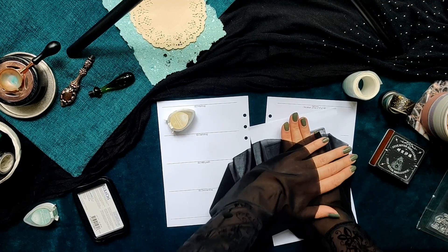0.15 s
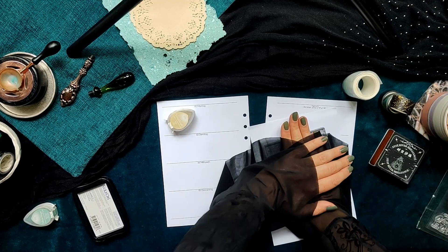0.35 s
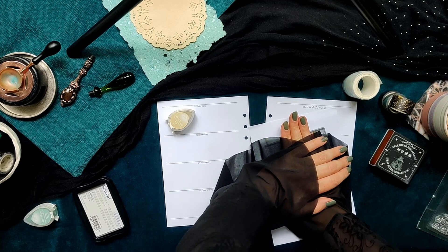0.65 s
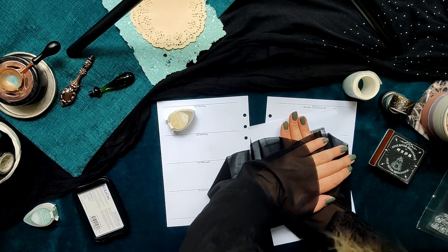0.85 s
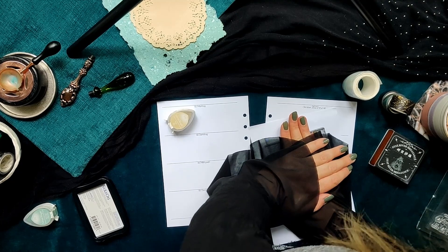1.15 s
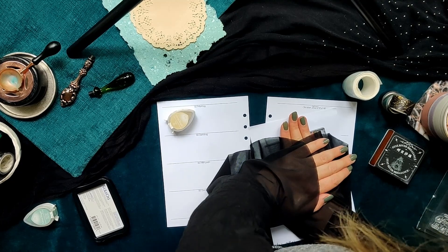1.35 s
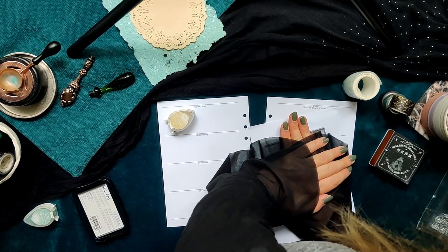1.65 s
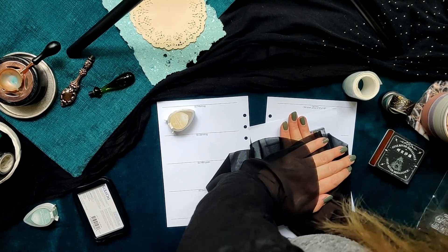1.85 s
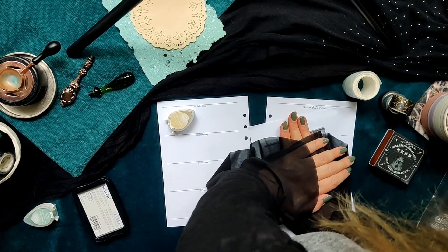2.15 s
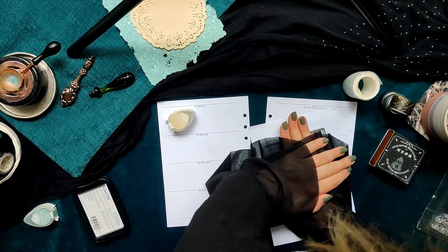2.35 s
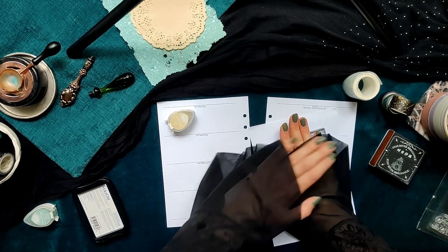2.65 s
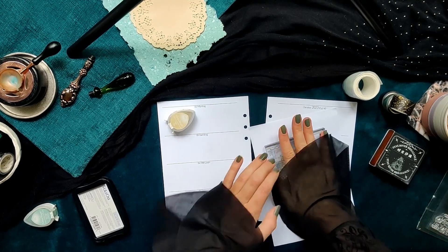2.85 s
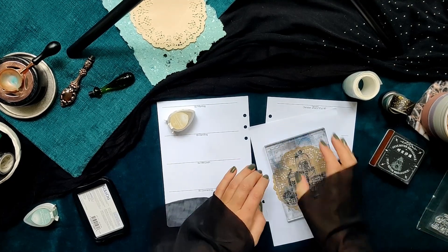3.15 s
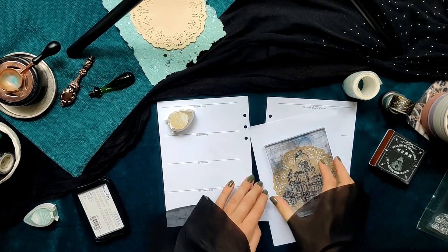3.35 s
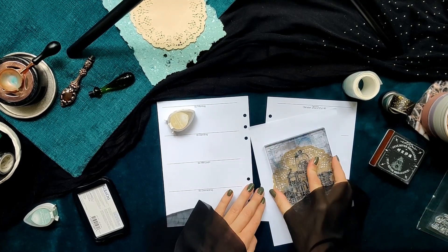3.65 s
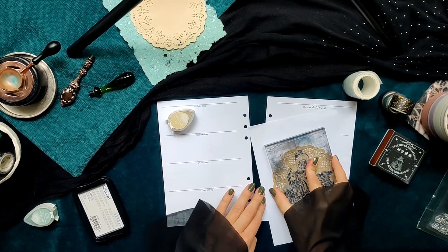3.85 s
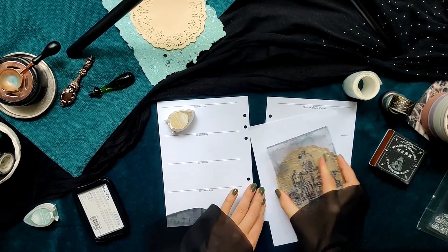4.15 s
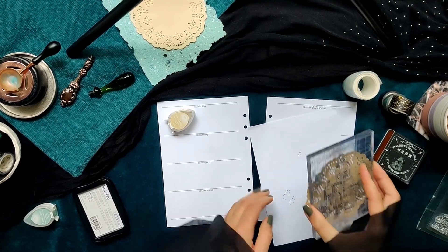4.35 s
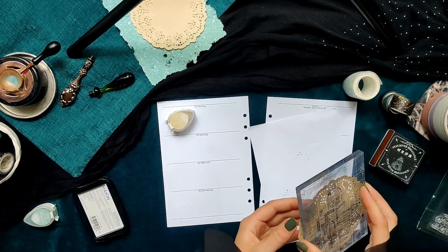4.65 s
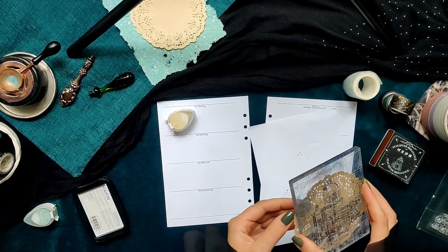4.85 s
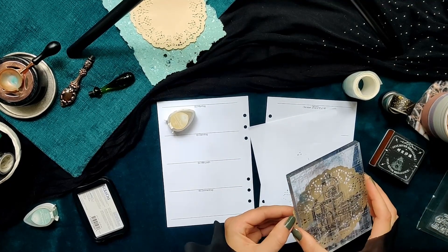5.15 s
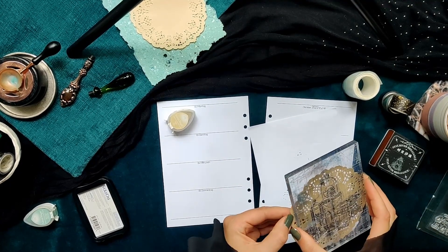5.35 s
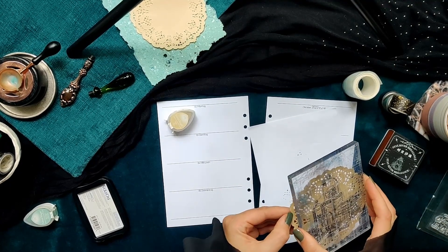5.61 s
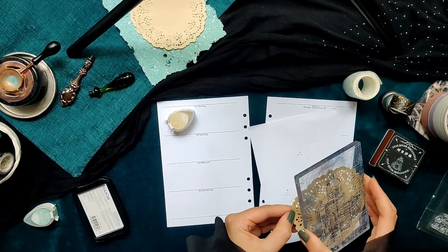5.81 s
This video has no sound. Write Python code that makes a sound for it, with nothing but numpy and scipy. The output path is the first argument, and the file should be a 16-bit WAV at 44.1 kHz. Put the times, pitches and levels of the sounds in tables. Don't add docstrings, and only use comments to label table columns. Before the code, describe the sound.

Close stereo pickup at a table indoors: a strong low boom and cloth brush open, then scattered creaks and pops of table joints grow into sharp woody cracks. Pressure eases, palm and sleeve scuff softly, the block peels and tips with dull thuds, and tiny finger clicks end it. Muffled traffic, a rising engine and faint passing tyres come through the walls.

```python
import sys
import numpy as np
from scipy import signal
from scipy.fft import rfft, irfft
from scipy.io import wavfile
from scipy.ndimage import uniform_filter1d

SR = 44100
rng = np.random.default_rng(int(sys.argv[2]) if len(sys.argv) > 2 else 0)


def voltage_ratio(decibels):
    exponent = np.asarray(decibels, float) / 20
    return 10 ** exponent


def digitize_waveform(pressure):
    field = np.atleast_2d(pressure).T
    bounded = np.clip(field, -1, 1)
    quanta = np.round(bounded * 32767).astype(np.int16)
    wavfile.write(sys.argv[1], SR, quanta)


N = 263596

# [start t/s, peak level/dB, f/Hz]
ROOM_SWELLS = [(-0.06, -16.5, 37.36), (0.23, -22, 36.26), (0.45, -28, 38.5), (0.56, -37, 37.4),
               (0.75, -43, 37.3), (0.93, -38, 36.6), (1.16, -35.5, 36.1), (1.5, -35.5, 36.9),
               (1.7, -39, 36.8), (1.93, -35.5, 35.8), (2.08, -32, 36.5), (2.3, -33.5, 36.7),
               (2.46, -35.5, 37), (2.6, -32.5, 34.75), (2.8, -41, 36.2), (2.87, -33.5, 38.77),
               (3.03, -30.5, 38.3), (3.69, -29.5, 37.04), (3.87, -43, 38.02), (3.95, -42, 41.3),
               (4.08, -35.5, 40.9), (4.22, -50, 41), (4.3, -42, 39.5), (4.41, -36, 38.3),
               (4.6, -33.5, 37.6), (4.88, -33.5, 37.08), (5.41, -33, 36.48), (5.61, -30.5, 37.46),
               (5.93, -36, 37.2), (6.2, -33, 37.2)]
SWELL_DIP, SWELL_ROUND = 0.22, 0.8
SWELL_EDGE_S = 0.33

# [t/s, level/dB]
TRAFFIC = [(0.0, 6), (0.3, 7), (0.58, 7.5), (0.83, 2.5), (1.05, -1.5), (1.3, -4), (2.0, 0.5), (2.2, 3),
           (2.36, 0.5), (3.0, -1), (3.4, 3), (3.8, 0.5), (4.3, -1.5), (4.81, 0), (5.56, 1.5), (5.83, 2.5),
           (5.98, 5.5)]
# [f/Hz, level/dB per Hz]
RUMBLE_SPECTRUM = [(6, -2), (18, 0), (30, 2.5), (50, -8.5), (70, -6), (90, -21), (107, -9.5), (135, -21),
                   (250, -29), (500, -83)]
# [f/Hz, level/dB per Hz]
WASH_SPECTRUM = [(88, -35), (150, -15.5), (254, -8.5), (312, -10.5), (378, -11.5), (407, -14.5),
                 (507, -10.5), (613, -15), (1280, -14), (1370, -17.5), (5000, -34), (6500, -41.5),
                 (11000, -120)]
# [t/s, extra wash level/dB]
PASSING_CARS = [(0, 1.5), (1.0, 1.5), (4.7, 0), (5.4, 0), (5.98, 0)]
RUMBLE_DB, WASH_DB, WASH_FOLLOWS = -41, -54, 0.48

# [f/Hz, level/dB, T60/s]
TOP_MODES = [(463, 5, 0.085), (600, 1, 0.069), (711, 2, 0.083), (880, -5, 0.033), (1177, -1.5, 0.081),
             (1400, -12, 0.029), (1680, 4, 0.015), (2300, -7, 0.02), (2600, -12, 0.02)]
# [f/Hz, level/dB, T60/s]
FRAME_MODES = [(114, -7, 0.064), (135.7, -2, 0.063), (167, -1.5, 0.074), (200.5, -0.5, 0.074),
               (248.8, -3, 0.089), (328, -6.5, 0.091)]
# [f/Hz, level/dB per Hz]
CRACK_SPECTRUM = [(100, -42.5), (300, -9), (700, -3.5), (2270, -5), (3200, -8), (4600, -13.5),
                  (7000, -22.5), (10000, -33.5), (16000, -68)]
# [f/Hz, width/Hz, level/dB]
PANEL_HUMPS = [(480, 70, 3), (705, 70, 2.5), (880, 80, 3.5), (1156, 90, 3), (1610, 100, 2), (2050, 260, 1),
               (2590, 190, 1.5), (3330, 200, 1.5)]
# [t/s, peak level/dB, brightness/dB, thump/dB]
LEANING_SLIPS = [(0.339, -37, -20, -4), (0.346, -29, -23.5, -2.5), (0.354, -34, -6, -21),
                 (0.386, -45, -20, 6), (0.426, -46, -21, -1), (0.499, -35.5, -19, 1),
                 (0.658, -30.5, -15.5, -4), (0.695, -37.5, -20, -4), (0.768, -34.5, -18, -0.5),
                 (0.8, -37, -23, 2), (0.852, -31, -27, -1.5), (0.89, -47, -9, -13), (0.961, -27.5, -15, -4),
                 (0.994, -39, -19, 2), (1.132, -31.5, -20.5, 0.5), (1.161, -24.5, -19, -9),
                 (1.195, -46, -27, 5), (1.666, -38.5, -19, -25), (1.816, -52, -28, 1),
                 (1.959, -17.5, -14.5, -12), (2.0225, -23, -17, -9), (2.142, -18, -16.5, -8.5),
                 (2.183, -21.5, -18, -28), (2.223, -33, -22, -23), (2.289, -38.5, -34, 4),
                 (2.342, -46.5, -19.5, 4)]
# [t/s, peak level/dB, brightness/dB, thump/dB]
LIFTING_SLIPS = [(2.545, -44.5, -33, -26), (2.599, -54, -26, 14.5), (2.689, -48, -7, 3),
                 (2.812, -54, -11, 8), (3.838, -39.5, -17, -7), (3.9085, -37, -19.5, -3),
                 (3.987, -35, -13, -8), (4.028, -53, -20, 7), (4.152, -46, -13, -6),
                 (4.182, -47.5, -19, -1), (4.2, -43, -14, -3), (4.223, -53, -11, -4), (4.37, -57, -15, -16)]
SOFT_DB, TOP_RING_DB, RING_LOSS = -35, -6.5, 0.55
SLIP_S, SHORTENING = 0.0078, 0.017

# [t/s, f/Hz, peak level/dB, T60/s]
TOOL_RING = (0.003, 2000, -50, 0.4)
# [t/s, f/Hz, peak level/dB]
TOP_RING_OUTS = [(.345, 1723, -24.5), (0.358, 1400, -31), (0.361, 1156, -35), (.501, 1400, -35),
                 (.502, 711, -42.5), (.375, 1700, -40), (.385, 1156, -41), (.425, 1350, -42),
                 (.966, 2200, -40), (3.92, 1480, -42), (.66, 1400, -33), (.697, 711, -37), (.772, 711, -42),
                 (.856, 711, -42), (.856, 1724, -37), (1.669, 463, -34), (2.348, 463, -38),
                 (2.6, 463, -37.5), (2.69, 600, -47), (2.814, 2420, -43.5), (3.838, 1750, -31),
                 (3.842, 1173, -38), (3.911, 711, -35.5), (3.911, 1400, -36.5), (3.987, 1400, -32.5),
                 (3.989, 711, -36.5), (3.988, 3450, -33), (3.989, 2300, -33), (3.918, 440, -40),
                 (1.165, 463, -37), (1.965, 463, -36), (2.148, 600, -30), (4.272, 2392, -47),
                 (5.243, 699.6, -45.5), (5.243, 440, -47), (5.243, 1400, -45), (3.92, 560, -47),
                 (3.93, 711, -44), (2.183, 625, -31), (2.22, 1146, -40)]
# [t/s, f/Hz, peak level/dB]
FRAME_THUMPS = [(0.0052, 200, -36), (.035, 220, -36), (.06, 197, -43), (1.668, 189, -44.5),
                (.345, 190, -38), (2.812, 173, -46), (0.0187, 137, -29), (0.0225, 105.6, -27),
                (.36, 254, -32), (.808, 174, -36), (0.9, 177, -41), (1.17, 199, -29.5), (1.6, 230, -51),
                (0.58, 68, -36), (1.96, 174.6, -23.5), (1.962, 110, -30), (2.15, 107, -32),
                (1.165, 170, -32), (1.99, 71.5, -32), (2.146, 161, -29.5), (2.17, 72, -34),
                (1.31, 123, -36.5), (2.549, 123, -36.5), (2.6, 245, -49), (2.2, 271, -31.5),
                (3.9, 110, -35), (3.87, 72, -38), (3.99, 130, -38), (3.91, 260, -38.5), (4.2, 112, -30.5),
                (2.93, 65, -39.5), (0.88, 300, -39), (.855, 240, -39), (.86, 165, -42), (1.163, 285, -40),
                (1.135, 216, -43), (0.69, 420, -44)]
# [t/s, f/Hz, peak level/dB]
PRESSED_RINGS = [(1.161, 3780, -39), (1.163, 2030, -28.5), (1.163, 880, -37), (1.165, 1580, -35),
                 (1.166, 2590, -38.5), (1.166, 705, -44), (1.134, 707, -34), (1.136, 1174, -36),
                 (1.96, 3850, -33), (1.961, 2650, -32), (1.962, 705, -35), (1.964, 2090, -25),
                 (1.961, 1180, -27), (1.966, 1650, -23), (1.99, 1642, -28), (2.024, 2600, -36),
                 (2.025, 3300, -36), (2.026, 1650, -33), (2.027, 880, -35), (2.147, 850, -25),
                 (2.147, 1222, -23), (2.148, 711, -36), (2.148, 1644, -31), (2.149, 2412, -30),
                 (2.15, 2579, -32), (2.152, 2805, -35), (2.176, 2130, -35), (2.177, 1170, -35),
                 (2.185, 900, -34), (2.185, 3284, -27), (2.188, 2575, -31), (2.19, 1340, -32),
                 (2.191, 734, -35.5), (.35, 711, -37.5), (.36, 560, -32), (.345, 440, -39),
                 (.432, 453, -38), (2.547, 1500, -49), (2.548, 1180, -48), (2.575, 753, -45),
                 (2.608, 463, -43.5), (2.688, 880, -50), (2.76, 470.3, -45), (3.91, 3399, -42),
                 (3.989, 2830, -33), (3.992, 2200, -37), (4.013, 1490, -39), (3.988, 3340, -36),
                 (3.989, 1910, -39), (3.925, 1460, -45), (.692, 1450, -44), (.692, 1050, -43),
                 (4.016, 2700, -41), (3.87, 1747, -46), (2.59, 1750, -50), (2.72, 900, -50),
                 (3.87, 395, -42), (4.06, 1349, -43), (.963, 711, -33.5), (.964, 1185, -36),
                 (.66, 711, -36)]
# [t/s, f/Hz, peak level/dB]
TIPPING_THUDS = [(4.181, 150, -28), (4.19, 300, -39), (4.198, 112, -29), (4.206, 190.2, -32),
                 (4.2, 255, -35), (4.213, 460, -42), (4.223, 105, -30), (4.225, 230, -36),
                 (4.244, 110, -37), (4.25, 290, -41)]
# [f/Hz, T60/s]
RING_DECAY = [(72, 0.33), (110, 0.11), (180, 0.11), (255, 0.13), (463, 0.062), (711, 0.12), (1170, 0.063),
              (1730, 0.047), (2400, 0.053), (3400, 0.038)]
PRESS_DAMPING, THUD_DAMPING = 0.55, 0.62

# [peak t/s, rise/s, fall/s, sleeve level/dB, paper and palm level/dB]
BRUSH_STROKES = [(0.09, 0.31, 0.15, -54.5, -54.5), (1.44, .04, .09, -70, -83),
                 (1.556, 0.13, 0.26, -66.5, -66.5), (1.67, 0.011, 0.15, -59, -61),
                 (2.73, 0.17, 0.22, -59, -53), (2.95, 0.27, 0.15, -51.5, -53),
                 (3.19, 0.075, 0.24, -74, -60.5), (3.35, 0.18, 0.22, -56, -58),
                 (3.66, 0.55, .13, -66, -63.5), (4.41, 0.087, 0.27, -63.5, -61)]
# [f/Hz, width/Hz, level/dB]
GAUZE_BANDS = [(3530, 930, -0.5), (5440, 420, -6.5)]
STROKE_DROP_DB, STROKE_ROUND = 20, 1.3

# [t/s, peak level/dB]
SHARP_TICKS = [(.8559, -38), (.9627, -38), (.9687, -38), (.9891, -42), (1.1629, -34), (1.1677, -33),
               (1.1873, -39), (1.2214, -43), (1.9617, -25), (1.9654, -24), (1.9802, -34), (1.9861, -34),
               (2.0035, -34), (2.0238, -19), (2.0302, -32), (2.0508, -37), (2.1437, -28), (2.1482, -22),
               (2.1696, -33), (2.1758, -28), (2.181, -27), (2.1863, -29), (2.1973, -35), (2.2179, -34),
               (2.2321, -39), (2.5465, -48), (3.8451, -36), (3.8495, -39), (3.8686, -49), (3.9879, -35),
               (3.9904, -35), (3.9097, -43), (.6595, -38), (.7671, -43), (.5005, -42), (4.015, -43)]

# [t/s, firing f/Hz, level/dB]
ENGINE_PULLS = [
    [(0.9, 60.9, -56), (1.06, 64.5, -48), (1.312, 68.9, -48), (1.646, 70.06, -49), (1.91, 74.4, -62)],
    [(3.8, 49.8, -47), (4.04, 52.66, -47), (4.17, 53.25, -43), (4.5, 56.58, -45.5), (4.65, 58.27, -42.5),
     (5.15, 63.27, -46), (5.55, 68, -47), (5.7, 69.96, -44), (5.98, 73.67, -43)],
]
# [multiple of the firing frequency, level/dB]
ENGINE_ORDERS = [(1, 2.5), (1.5, -11), (2, -8), (3, -16.5), (3.5, -19.5), (4, -21)]
UPPER_ORDERS_DB = [-4, -3]
WALL_HZ, WALL_WIDTH_HZ, WALL_DB = 70.5, 6, 5

# [t/s, peak
# level/dB, lowest f/Hz, highest f/Hz, length/s]
BRIEF_FLECKS = [(4.194, -49.5, 3900, 8000, 0.011), (4.375, -56, 2400, 8850, 0.0061),
                (4.868, -60.5, 5000, 11200, 0.0063), (5.072, -60, 7920, 14200, 0.0031),
                (1.191, -57, 1510, 3300, 0.045), (2.189, -35, 650, 3300, .004),
                (1.965, -31, 420, 3600, 0.0038), (2.148, -32.5, 590, 2800, 0.0031),
                (1.24, -53, 1500, 2250, 0.027), (2.546, -55, 700, 2300, .003),
                (4.15, -51, 1800, 4000, .003), (5.2428, -47, 11000, 15400, .003),
                (2.1755, -37, 510, 4700, 0.003), (5.2422, -38, 1480, 6000, 0.0036),
                (5.2434, -48, 6020, 16000, 0.0026), (5.252, -55.5, 1994, 8100, 0.023),
                (5.555, -59.5, 4800, 8400, 0.0037), (5.686, -61, 3020, 6100, 0.0039),
                (5.771, -55, 3500, 13600, 0.004), (5.881, -52.5, 5430, 9700, 0.01),
                (2.551, -62, 300, 1300, 0.062), (5.9, -65, 3600, 8890, 0.013),
                (5.969, -50.5, 2800, 15100, 0.0028)]
# [t/s, peak level/dB]
BRIGHT_SNAPS = [
    (1.9585, -31.5),
    (2.0225, -42.5),
    (2.1415, -37),
]
# [t/s, peak level/dB, lowest f/Hz, highest f/Hz, length/s]
RUBBER_PEELS = [(3.843, -53, 2600, 6500, .005), (3.866, -60, 3000, 6000, .005),
                (3.986, -52, 4500, 9000, .003), (4.39, -61, 2900, 4200, .022),
                (2.545, -52, 500, 1800, .004)]

# [f/Hz, width/Hz, level/dB]
TYRE_HUMPS = [(480, 50, -1), (990, 340, 3)]
# [t/s, level/dB]
TYRE_COURSE = [(0, -75), (4.6, -79), (5.1, -61), (5.5, -63), (5.7, -60), (5.98, -59)]

# [f/Hz, coherence]
LIKENESS = [(25, 0.85), (60, 0.64), (125, 0.88), (250, 0.72), (500, 0.5), (1000, 0.023), (4000, 0.031),
            (12000, 0.02)]
# [f/Hz, T60/s]
ROOM_DECAY = [(100, 0.58), (500, 0.29), (1500, 0.37), (2300, 0.37), (4000, 0.34), (8000, 0.32),
              (14000, 0.23)]
ROOM_DB, TICK_WET_DB, RING_WET_DB, PRESS_WET_DB = 5.5, -7, -14, -8

# [f/Hz, level/dB per Hz]
HISS_SPECTRUM = [(1470, -17), (2500, -1), (3810, -39.5), (4460, -6), (6490, -3), (12000, 1.5), (15100, 6),
                 (15800, 2), (15900, -45)]
# [t/s, level/dB]
HISS_COURSE = [(0.0, -61), (0.33, -60), (1.0, -65), (1.95, -66.5), (2.3, -64), (3.0, -65), (3.37, -64),
               (4.4, -65.5), (5.7, -65.5), (5.98, -62)]
LEFT_DB, RIGHT_DB, OFFSET = -0.3, -3.5, -0.0004


def evened(x):
    return x / np.sqrt(np.mean(x ** 2) + 1e-20)


def read(points, hz):
    f, value = np.transpose(points)
    return np.interp(np.log(hz + 1), np.log(f + 1), value)


def follow(rows, column):
    rows = np.asarray(rows)
    return np.interp(np.arange(N) / SR, rows[:, 0], rows[:, column])


def add(mix, s, sound):
    part = mix[..., round(s * SR):][..., :sound.shape[-1]]
    part += sound[..., :part.shape[-1]]


def humps(table, hz):
    return 10 * np.log10(sum(voltage_ratio(db) ** 2 / (1 + ((hz - f) / w * 2) ** 2) ** 2 for f, w, db in table))


def noise(colour_db, patchy_db, size):
    hop = size // 2
    frames, hz = N // hop + 5, np.fft.rfftfreq(size, 1 / SR)
    a, b, c, d, patches = rng.standard_normal((frames, len(hz), 5)).T
    patches = uniform_filter1d(patches, size=8, axis=0)
    patches = evened(uniform_filter1d(patches, size=5, axis=1))
    same = np.clip(read(LIKENESS, hz), -1, 1)[:, None]
    left = a + 1j * b
    right = same * left + np.sqrt(1 - same ** 2) * (c + 1j * d)
    z = np.array([left, right]) * voltage_ratio(colour_db(hz)[:, None] + patchy_db * patches)
    return evened(signal.istft(z, window="cosine", nperseg=size, noverlap=size - hop)[1][:, :N])


def boom():
    s, db, hz = np.transpose(ROOM_SWELLS)
    t = np.arange(N) / SR
    place = np.interp(t, s, np.arange(len(s)))
    swell = place.astype(int)
    roundness = SWELL_ROUND * np.minimum(SWELL_EDGE_S / np.diff(s), 1)[swell]
    arch = SWELL_DIP + (1 - SWELL_DIP) * abs(np.sin(np.pi * place)) ** roundness
    level = uniform_filter1d(voltage_ratio(db)[swell] * arch, size=1500)
    pitch = np.interp(t, (s[:-1] + s[1:]) / 2, hz[:-1])
    return np.sqrt(2) * level * np.cos(2 * np.pi * np.cumsum(pitch) / SR + 0.87)


def street():
    rumble = noise(lambda hz: read(RUMBLE_SPECTRUM, hz), 0.76, size=4096)
    wash = noise(lambda hz: read(WASH_SPECTRUM, hz), 0.71, size=1024)
    traffic_db = follow(TRAFFIC, 1)
    wash_db = WASH_DB + WASH_FOLLOWS * traffic_db + follow(PASSING_CARS, 1)
    return voltage_ratio(RUMBLE_DB + traffic_db) * rumble + voltage_ratio(wash_db) * wash


def timed(rows, share=1):
    return [(*row, share * read(RING_DECAY, row[1])) for row in rows]


def rings(rows):
    out, t = np.zeros((2, N)), np.arange(8192) / SR
    lead = np.array([[0], [0.00015]])
    for s, hz, db, t60 in rows:
        envelope = voltage_ratio(db - 60 * t / t60) * np.minimum(t / 0.00074, 1)
        add(out, s, envelope * np.sin(2 * np.pi * hz * (t + lead)))
    return out


def rubs():
    scuff_spectrum = [(1500, -23), (3500, -5.5), (6000, -6.5), (9000, -12.5), (16000, -22.0)]
    gauze = noise(lambda hz: humps(GAUZE_BANDS, hz), 2.3, size=256)
    scuff = noise(lambda hz: read(scuff_spectrum, hz), 1.6, size=256)
    s, rise, fall, sleeve_db, palm_db = np.transpose(BRUSH_STROKES)[:, :, None]
    t = np.arange(0, N + 64, 64) / SR
    away = np.maximum((s - t) / rise, (t - s) / fall)
    power = voltage_ratio(-STROKE_DROP_DB * away ** STROKE_ROUND) ** 2

    def course(db):
        return np.interp(np.arange(N) / SR, t, np.sqrt((voltage_ratio(db) ** 2 * power).sum(0)))

    return course(sleeve_db) * gauze + course(palm_db) * scuff


def causal(gain_db):
    log_gain = np.log(voltage_ratio(np.r_[gain_db, gain_db[-2:0:-1]]))
    return np.fft.ifft(np.exp(log_gain - 1j * signal.hilbert(log_gain).imag)).real


def flattened(x, size):
    z = rfft(x)
    return irfft(z / np.sqrt(uniform_filter1d(abs(z) ** 2, size) + 1e-12), x.shape[-1])


def modes(table, luck_db, t):
    x = sum(voltage_ratio(db + u - 60 * t / t60) * np.sin(2 * np.pi * hz * t)
            for (hz, db, t60), u in zip(table, luck_db))
    return x / np.linalg.norm(x)


def knock(db, bright_db, thump_db, luck, grit):
    t, hz = np.arange(6144) / SR, np.fft.rfftfreq(2048, 1 / SR)
    start = t[:2048]
    hard_db = max(db - SOFT_DB, 0)
    top_db = TOP_RING_DB - RING_LOSS * hard_db
    length = SLIP_S * (1 - SHORTENING * hard_db)
    slips = grit * abs(grit) * np.exp(-(start / max(1.33 * length, 0.0003)) ** 3.5)
    slips = slips * np.minimum(start / 0.0051 + 0.42, 1)
    slips = flattened(np.pad(slips, ((0, 0), (0, 2048))), size=24)[:, :2048]
    slips = slips * np.exp(-start / 0.019)
    octaves_up = np.clip(np.log2(hz / 2000 + 1e-3), 0, 1)
    panel_db = sum(hump_db / (1 + ((hz - f) / w * 2) ** 2) for f, w, hump_db in PANEL_HUMPS)
    crack = causal(read(CRACK_SPECTRUM, hz) + panel_db + (bright_db + 15.5) * octaves_up)[:1024]
    crack = signal.fftconvolve(slips, crack[None], axes=1)
    top = voltage_ratio(top_db + 9) * modes(TOP_MODES, 0.83 * luck, t)
    frame = voltage_ratio(thump_db + 9.5) * modes(FRAME_MODES, 1.8 * luck[::-1], t)
    sound = (top + frame) * np.minimum(t / 0.0043, 1) + np.zeros((2, 1))
    add(sound, 0, crack / np.linalg.norm(crack[0]))
    return voltage_ratio(db + 14) * sound


def knocks():
    out = np.zeros((2, N))
    for s, *row in LEANING_SLIPS + LIFTING_SLIPS:
        shared, own = rng.standard_normal(2048), rng.standard_normal((2, 2048))
        luck = rng.standard_normal(len(TOP_MODES))
        add(out, s, knock(*row, luck, 0.5 * shared + 0.62 * own))
    return out


def ticks():
    out = np.zeros((2, N))
    click = causal(read(CRACK_SPECTRUM, np.fft.rfftfreq(2048, 1 / SR)))[:1024]
    for k, (s, db) in enumerate(SHARP_TICKS):
        add(out, s, (-1) ** k * voltage_ratio(db + 2.5) * click[None] / abs(click).max())
    return out


def engine():
    out = np.zeros(N)
    for rows, upper_db in zip(ENGINE_PULLS, UPPER_ORDERS_DB):
        firing_hz, level_db = follow(rows, 1), follow(rows, 2)
        turns = np.cumsum(firing_hz) / SR
        first, last = rows[0][0], rows[-1][0]
        fade = np.interp(np.arange(N) / SR, [first - 0.15, first, last, last + 0.11], [0, 1, 1, 0])
        for k, db in ENGINE_ORDERS:
            waver = uniform_filter1d(rng.standard_normal(N), size=6000)
            waver_db = 1.3 * evened(uniform_filter1d(waver, size=6000))
            wall_db = WALL_DB / (1 + ((k * firing_hz - WALL_HZ) / WALL_WIDTH_HZ * 2) ** 2)
            order_db = level_db + db + upper_db * (k > 1) + waver_db + wall_db
            tone = np.sin(2 * np.pi * (k * turns + rng.random()))
            out += np.sqrt(2) * fade * voltage_ratio(order_db) * tone
    return out


def flecks(rows):
    out, t = np.zeros((2, N)), np.arange(8192) / SR
    for s, db, low_hz, high_hz, length in rows:
        band = signal.butter(2, [low_hz, high_hz], "band", fs=SR)
        puff = evened(signal.lfilter(*band, rng.standard_normal((2, len(t)))))
        add(out, s, voltage_ratio(db) * puff * t / length * np.exp(1 - t / length))
    return out


def snaps():
    out, t = np.zeros((2, N)), np.arange(2048) / SR
    band = signal.butter(2, [8000, 15800], "band", fs=SR)
    for s, db in BRIGHT_SNAPS:
        fizz = signal.lfilter(*band, rng.standard_normal((2, len(t))))
        add(out, s, voltage_ratio(db - 60 * t / 0.02) * fizz)
    return out


def tyres():
    return voltage_ratio(follow(TYRE_COURSE, 1)) * noise(lambda hz: humps(TYRE_HUMPS, hz), 1.4, size=1024)


def room(x):
    out, phase = np.zeros((2, N)), 2 * np.pi * 2.3 * np.arange(N) / SR
    for k in range(3):
        taps = np.zeros((2, SR // 2))
        grid = np.arange(120, SR // 2 - 20, 20)
        at = grid + rng.integers(0, 20, (2, len(grid)))
        echoes = rng.choice([-1., 1.], at.shape) * voltage_ratio(3.8 * rng.standard_normal(at.shape))
        np.put_along_axis(taps, at, echoes, 1)
        hz, t, z = signal.stft(taps, SR, nperseg=256)
        same = np.clip(read(LIKENESS, hz), -1, 1)[:, None]
        z[1] = same * z[0] + np.sqrt(1 - same ** 2) * z[1]
        tail = signal.istft(z * voltage_ratio(-60 * t / read(ROOM_DECAY, hz)[:, None]), SR, nperseg=256)[1]
        turn = np.sqrt(2 / 3) * np.cos(phase + k * np.pi / 3)
        out += signal.fftconvolve(x * turn, tail / np.linalg.norm(tail[0]), axes=1)[:, :N]
    return out


def scene():
    table, edges, clicks = knocks(), snaps(), ticks()
    parts = rings([TOOL_RING] + timed(TOP_RING_OUTS + FRAME_THUMPS) + timed(TIPPING_THUDS, THUD_DAMPING))
    pressed = rings(timed(PRESSED_RINGS, PRESS_DAMPING))
    sent = table + voltage_ratio(TICK_WET_DB) * clicks + voltage_ratio(RING_WET_DB) * parts + voltage_ratio(PRESS_WET_DB) * pressed
    wet = voltage_ratio(ROOM_DB) * room(sent)
    struck = voltage_ratio(5.0) * table + edges + clicks + parts + pressed
    rubbed = rubs() + flecks(BRIEF_FLECKS) + flecks(RUBBER_PEELS)
    outside = street() + engine() + tyres()
    return struck + wet + rubbed + boom() + outside


def band_limit(x):
    return signal.sosfilt(signal.butter(12, 15800, fs=SR, output="sos"), x)


def record(dry):
    hiss = voltage_ratio(follow(HISS_COURSE, 1) + 3.5) * noise(lambda hz: read(HISS_SPECTRUM, hz), 0.4, size=512)
    balance = voltage_ratio(np.array([[LEFT_DB], [RIGHT_DB]]))
    return band_limit((dry + hiss) * balance + OFFSET)


dry = scene()
out = record(dry)
digitize_waveform(out)
```